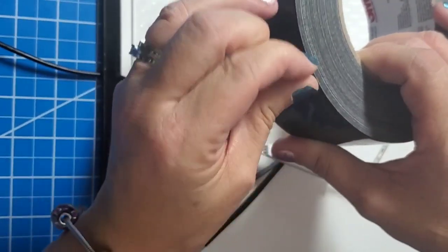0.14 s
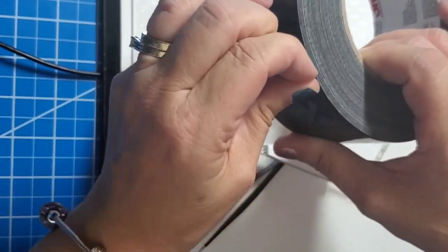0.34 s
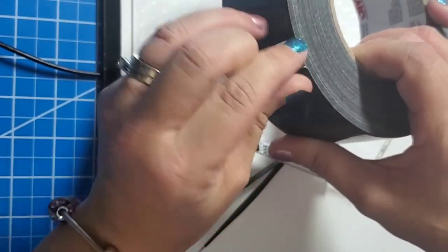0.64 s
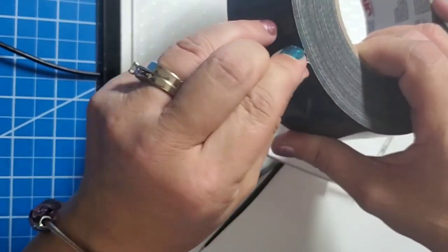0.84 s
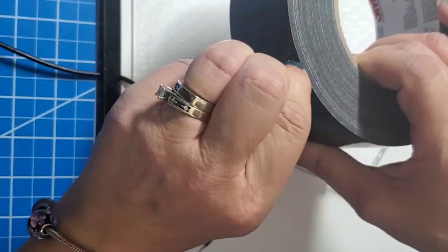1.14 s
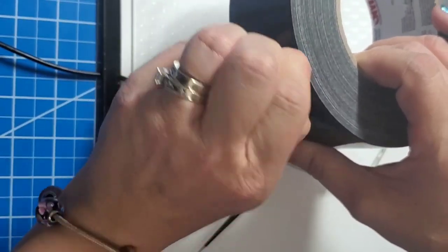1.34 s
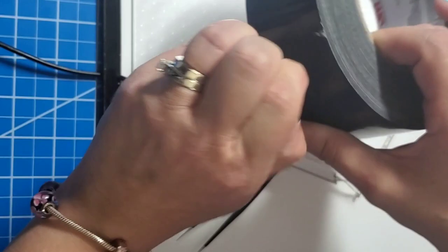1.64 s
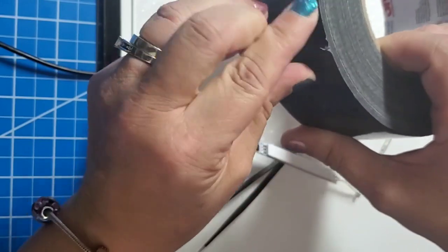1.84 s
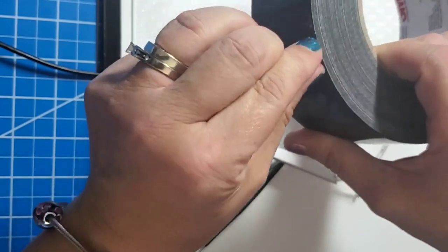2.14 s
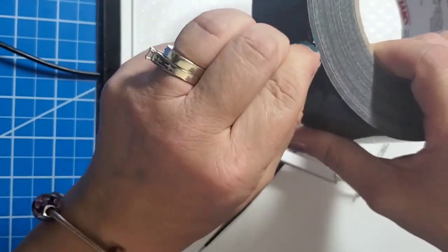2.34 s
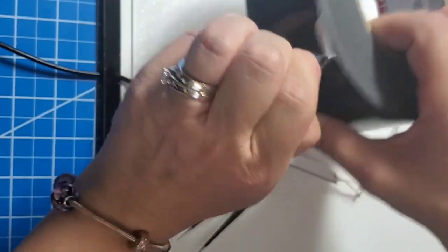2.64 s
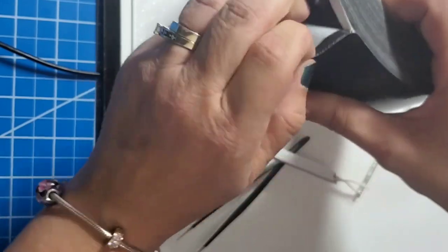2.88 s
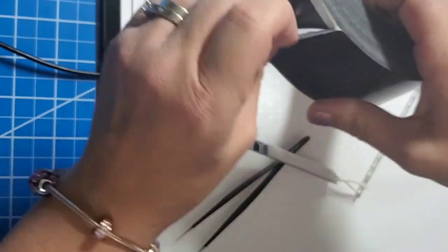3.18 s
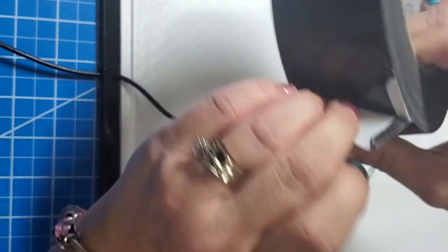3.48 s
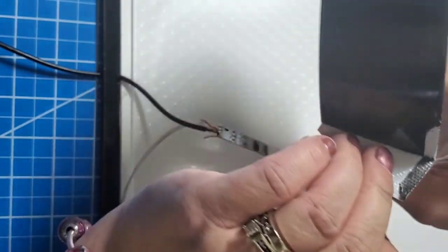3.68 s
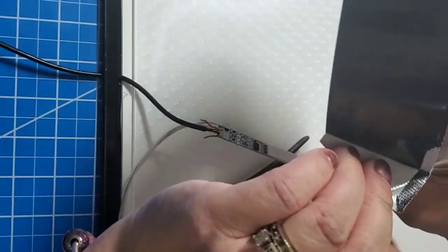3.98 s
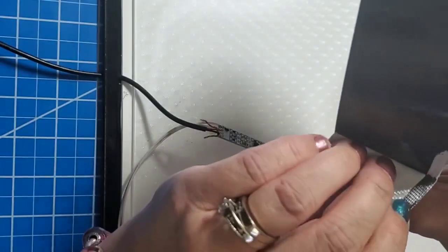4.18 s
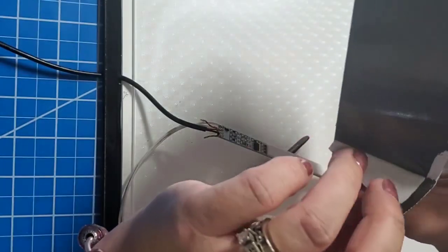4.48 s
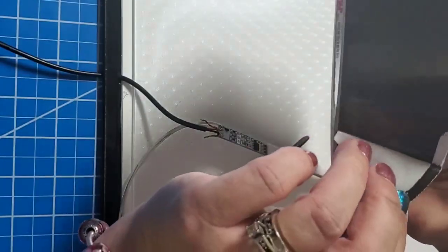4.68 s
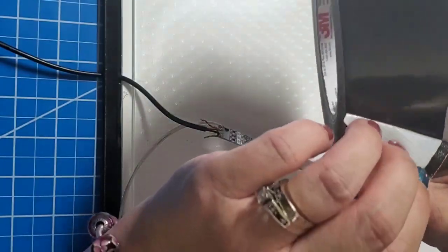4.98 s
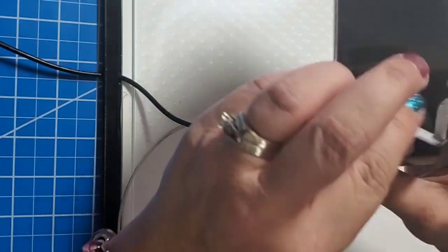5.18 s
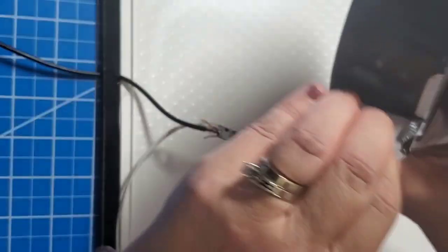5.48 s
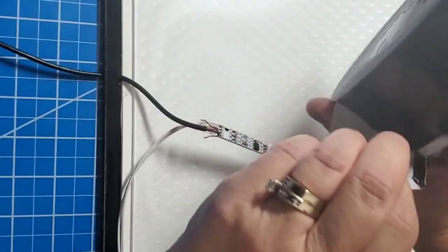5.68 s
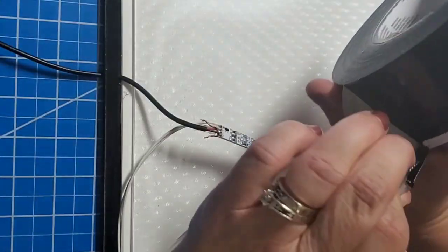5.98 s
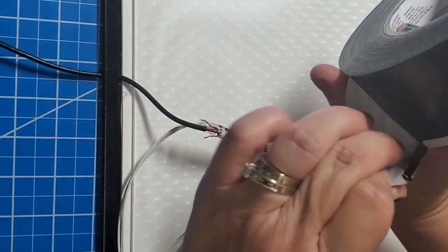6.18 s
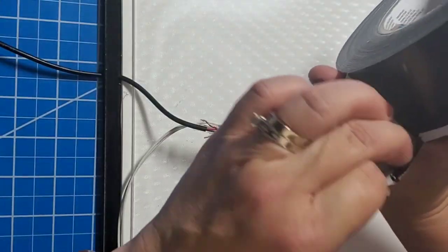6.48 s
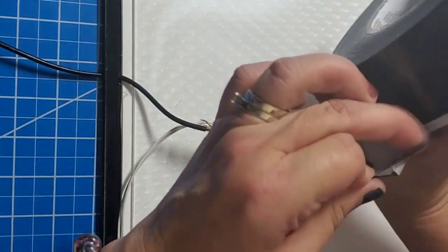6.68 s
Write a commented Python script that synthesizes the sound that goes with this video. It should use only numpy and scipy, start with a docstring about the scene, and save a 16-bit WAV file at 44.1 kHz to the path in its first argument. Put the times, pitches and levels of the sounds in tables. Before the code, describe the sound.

A quick peel of sticky tape, a pause, then a brief tear and stiff crackling close by.

```python
"""Duct tape peeled and torn

Tape is picked off its roll, peeled a little and torn across by hand over a desk in a quiet small room.
The glue lets go in a fizz of tiny strands, the cloth threads break in a short rip, and the stiff
strip snaps and crinkles as it buckles. A low hum runs underneath."""
import sys
import numpy as np
from scipy import signal
from scipy.fft import rfft, irfft
from scipy.io import wavfile

SR = 44100
rng = np.random.default_rng(int(sys.argv[2]) if len(sys.argv) > 2 else 0)


def persist_wave(psi):
    """Save psi, clipped to +-1, as 16-bit WAV."""
    counts = np.round(np.clip(psi, -1, 1) * 32767).astype(np.int16)
    wavfile.write(sys.argv[1], SR, np.atleast_2d(counts).T)


N = 300938


def from_db(db):
    """Decibels to gain."""
    return 10 ** (np.asarray(db) / 20)


def unit_rms(x):
    """Scale to rms 1."""
    return x / np.sqrt(np.mean(x ** 2) + 1e-20)


def drift(rate_hz):
    """Random wander of rms 1."""
    knots = rng.standard_normal(int(N / SR * rate_hz) + 2)
    return unit_rms(np.interp(np.arange(N) / SR * rate_hz, np.arange(len(knots)), knots))


def band(x, low_hz, high_hz=.45 * SR, order=2):
    """Causal band-pass."""
    return signal.sosfilt(signal.butter(order, [low_hz, high_hz], "band", fs=SR, output="sos"), x)


def coloured(x, colour, size=4096):
    """Minimum-phase filter that keeps white noise's power. Each colour row: Hz, relative density in dB."""
    hz, db = np.transpose(colour)
    bins_hz = np.fft.rfftfreq(size, 1 / SR)
    gain = unit_rms(from_db(np.interp(np.log(bins_hz + 1), np.log(hz), db)))
    cepstrum = irfft(np.log(gain))
    cepstrum[1:size // 2] *= 2
    cepstrum[size // 2 + 1:] = 0
    impulse = irfft(np.exp(rfft(cepstrum)))
    return signal.oaconvolve(x, impulse[None], axes=-1)[:, :x.shape[-1]]


def noise_pair(correlation, size):
    """Stereo white noise."""
    mid, side = rng.standard_normal((2, size))
    mid, side = np.sqrt(1 + correlation) * mid, np.sqrt(1 - correlation) * side
    return np.array([mid + side, mid - side]) / np.sqrt(2)


def panned(x, pan_db):
    """Equal-power pan; positive is left."""
    return x * unit_rms(from_db(np.array([[pan_db], [-pan_db]]) / 2))


def ping(t, hz, cycles):
    """Tone of rms 1 that swells and dies within a few cycles."""
    return unit_rms(np.sin(2 * np.pi * hz * t) * t * np.exp(-2 * t * hz / cycles))


def strokes(rows, fullness, peak_at):
    """Each pull swells and lets go in one arch; gain and break rate follow it."""
    t, gain, breaks_per_s = np.arange(N) / SR, np.zeros(N), np.zeros(N)
    for start_s, length_s, peak_db, peak_per_s in rows:
        phase = np.interp((t - start_s) / length_s, [0, peak_at, 1], [0, .5, 1])
        pull = (4 * phase * (1 - phase)) ** fullness
        gain = np.hypot(gain, from_db(peak_db) * pull)
        breaks_per_s = np.maximum(breaks_per_s, peak_per_s * pull ** .8)
    return gain, breaks_per_s


def crackle(pulls, colour, ring_s, correlation, pan_db, uneven_db=3, stick_slip_db=0):
    """Tiny breaks of uneven size come at random; each shakes the sheet briefly."""
    gain, breaks_per_s = pulls
    sizes = from_db(uneven_db * np.minimum(rng.exponential(1, N), 3)) ** 2
    # Tension builds and lets go: breaks come unevenly but never stall for long.
    thresholds = np.cumsum(rng.gamma(2, .5, N // 10))
    breaks = np.diff(np.searchsorted(thresholds, np.cumsum(breaks_per_s) / SR), prepend=0)
    rasp = unit_rms(from_db(stick_slip_db * drift(450)))
    energy = breaks * sizes / sizes.mean() * SR / np.maximum(breaks_per_s, 1) * (rasp * gain) ** 2
    pole = np.exp(-2 / (ring_s * SR))
    shake = np.sqrt(signal.lfilter([1 - pole], [1, -pole], energy + 1e-18))
    return panned(coloured(shake * noise_pair(correlation, N), colour), pan_db)


def desk_bumps(desk_hz=65, half_width_s=.028):
    """Hands bump the desk; its top sways briefly at its lowest pitch."""
    # Each row: centre in seconds, level in dB.
    bumps = [(0.169, -62), (1.252, -55.5), (1.72, -56), (2.291, -58.5), (2.37, -57), (3.139, -66),
             (5.169, -57.5)]
    t = np.arange(N) / SR
    return sum(from_db(db) * np.exp(-((t - s) / half_width_s) ** 2)
               * np.sin(2 * np.pi * desk_hz * (t - s)) for s, db in bumps)


def background(waver_db=4, rumble_db=-69.5, hiss_db=-84.5):
    """Wavering hum, room rumble and desk bumps, a little to the left; faint hiss in each channel."""
    # Each row: frequency in Hz, level in dB.
    hum_tones = [(75.4, -74), (123.8, -75.5), (150.7, -75)]
    # Each row: frequency in Hz, relative density in dB.
    rumble_colour = [(25, -16), (45, -12.5), (66, 0), (95, -8.5), (150, -7.5), (210, -14), (320, -22),
                     (600, -31), (1500, -43), (8000, -52.5)]
    hiss_colour = [(100, 3), (600, 2.5), (1500, 5.5), (5000, 2), (16000, -9)]
    t, hum = np.arange(N) / SR, np.zeros(N)
    for hz, db in hum_tones:
        amplitude = np.sqrt(2) * from_db(db + waver_db * drift(7.3))
        hum += amplitude * np.sin(2 * np.pi * hz * t + .5 * drift(1.1))
    rumble = from_db(rumble_db) * coloured(noise_pair(.96, N), rumble_colour)
    swell = band(rumble, 40, 90, order=1) * (from_db(-.5 * drift(11)) - 1)
    hiss = from_db(hiss_db) * coloured(rng.standard_normal((2, N)), hiss_colour)
    return panned(hum + rumble + swell + desk_bumps(), pan_db=3) + hiss


def room(x, t60_s=.18, build_s=.0028, level_db=-5, mono_below_hz=570, size=16384):
    """Dense reflections build fast and die evenly; only their bass is alike in both ears."""
    # Each row: frequency in Hz, relative density in dB.
    colour = [(200, -4.5), (400, -2.5), (620, 0), (1400, -1.5), (1950, -0.5), (2900, -2), (3800, 0.5),
              (7000, -2), (11000, 0.5), (16000, -3)]
    t = np.arange(size) / SR
    pair = noise_pair(.15, size)
    mid = pair.mean(axis=0)
    envelope = from_db(-60 * t / t60_s) * (1 - np.exp(-(t / build_s) ** 2))
    tail = (mid + band(pair - mid, mono_below_hz)) * envelope
    tail = coloured(unit_rms(tail), colour) / np.sqrt(size)
    return from_db(level_db) * signal.oaconvolve(x, tail, axes=-1)[:, :N]


def strip_resonance(x, q=12):
    """The stretched strip and the roll ring at a few pitches."""
    # Each row: frequency in Hz, boost in dB.
    modes = [(630, 4.5), (1930, 5.5), (2400, 2), (3800, 2.5), (4900, 2.5), (6150, 0)]
    return x + sum((from_db(db) - 1) * signal.lfilter(*signal.iirpeak(hz, q, fs=SR), x + 1e-18)
                   for hz, db in modes)


def finger_rub():
    """Fingertips slide and catch on the roll."""
    # Each row: start in seconds, length in seconds, peak in dB, peak catches per second.
    rubs = [(0.6, 1.1, -80.5, 3000)]
    # Each row: frequency in Hz, relative density in dB.
    colour = [(200, 9), (500, 11), (900, -0.5), (2500, -4.5), (4500, -2.5), (7500, -12), (11000, -3),
              (16000, -11.5)]
    pulls = strokes(rubs, fullness=1, peak_at=.61)
    return crackle(pulls, colour, ring_s=.002, correlation=.31, pan_db=-1.5)


def tack_lift():
    """The sticky face lifts slowly under the fingers."""
    # Each row: start in seconds, length in seconds, peak in dB, peak strands per second.
    lifts = [(0.125, 0.087, -72, 600), (1.614, .07, -63, 900), (1.55, .53, -77, 900),
             (3.58, 0.59, -72, 170)]
    # Each row: frequency in Hz, relative density in dB.
    colour = [(1500, -28), (2800, -11.5), (4300, -4.5), (6800, -6.5), (10500, 2), (16000, -8)]
    pulls = strokes(lifts, fullness=1.3, peak_at=.65)
    return crackle(pulls, colour, ring_s=.0013, correlation=.22, pan_db=-1.2)


def strip_creak():
    """The taut strip creaks in small slips."""
    # Each row: start in seconds, length in seconds, peak in dB, peak slips per second.
    creaks = [(6.215, 0.11, -53.5, 260), (6.46, .05, -64, 270), (6.58, 0.089, -75, 210)]
    # Each row: frequency in Hz, relative density in dB.
    colour = [(1500, -40), (2300, -30), (2800, -16.5), (3800, 1.5), (5200, -4.5), (7200, -19.5),
              (12000, -12), (16000, -17)]
    pulls = strokes(creaks, fullness=.45, peak_at=.39)
    return crackle(pulls, colour, ring_s=.00055, correlation=.51, pan_db=-2.8, uneven_db=2.5)


def glue_peel():
    """Glue strands let go in a slow lift, then a quick pull; the peel line sticks and jumps, rasping."""
    # Each row: start in seconds, length in seconds, peak in dB, peak strands per second.
    peels = [(2.56, .17, -68, 600), (2.688, .097, -26, 4200)]
    # Each row: frequency in Hz, relative density in dB.
    colour = [(300, -22), (700, -18.5), (1300, -12.5), (1900, -5), (2600, -3), (3000, -9.5), (3400, 0),
              (5500, 2), (7500, 1), (11000, 2), (16000, -4.5)]
    pulls = strokes(peels, fullness=1.4, peak_at=.58)
    return crackle(pulls, colour, ring_s=.00037, correlation=.32, pan_db=.8, stick_slip_db=2.5)


def thread_rip():
    """Cloth threads break and the sheet crumples."""
    # Each row: start in seconds, length in seconds, peak in dB, peak breaks per second.
    rips = [(2.722, .052, -33, 1450), (5.48, .062, -22, 1500), (5.735, 0.044, -49, 580),
            (5.87, 0.051, -37.5, 410), (5.98, 0.055, -51.5, 700), (6.725, 0.076, -42, 525)]
    # Each row: frequency in Hz, relative density in dB.
    colour = [(200, -23.5), (350, -19.5), (600, -5.5), (950, -3.5), (1400, -4), (2000, -2), (4000, -2.5),
              (8000, -4), (16000, -11)]
    pulls = strokes(rips, fullness=1.3, peak_at=.49)
    return crackle(pulls, colour, ring_s=.00079, correlation=.62, pan_db=-.7)


def snaps(rise_s=.00074, ring_s=.00068, desk_bounce_s=.0021, flap_cycles=1.3, correlation=.28, size=1024):
    """The strip buckles or a glue blob pops: the sheet cracks and flaps, a crease pings, the roll thuds."""
    # Each row: start in seconds, relative level in dB, crack centre in Hz, flap offset in dB.
    buckles = [(2.996, -65.5, 4410, -13), (3.191, -62.5, 2390, -9), (4.167, -49.5, 3980, -25),
               (4.5392, -49.5, 4100, -6), (5.1265, -57.5, 2915, -8.5), (5.1943, -53.5, 4000, -4),
               (5.2445, -57.5, 5180, -3), (5.4785, -17.5, 5996, -29), (5.48, -18.5, 5900, -21),
               (5.496, -24, 4830, -17), (5.5042, -17, 4440, -11), (5.5091, -20, 3680, -22),
               (5.525, -21.5, 4200, -2.5), (5.5385, -22.5, 5000, -21), (5.715, -36, 4620, -2.5),
               (5.8429, -45.5, 3670, -11.5), (5.8698, -16.5, 3670, -8), (5.9055, -33, 4520, -1.5),
               (5.9088, -21.5, 5800, -25.5), (6.0017, -42, 4335, -17), (6.0128, -37.5, 3350, -6.5),
               (6.0237, -46, 4060, -5.5), (6.222, -52, 4130, -38), (6.2618, -49, 4260, -34),
               (6.2937, -43.5, 4240, -31), (6.31, -16, 3260, -23.5), (6.3205, -33, 4020, -22),
               (6.333, -18, 2950, -20.5), (6.465, -46, 5140, -33), (6.5134, -34, 5520, -39),
               (6.542, -24.5, 4180, -13), (6.659, -42, 3960, -8.5), (6.7225, -36.5, 4797, -10),
               (6.7489, -22, 4720, -15.5)]
    # Each row: start in seconds, relative tick level in dB.
    glue_pops = [(1.6294, -50), (2.5653, -54.5), (2.602, -54), (2.641, -39), (2.6794, -39), (2.6909, -35.5),
                 (2.7305, -24), (3.1077, -61.5), (3.9563, -54.5), (4.2082, -55.5)]
    # Harder buckle, tauter sheet, higher flap. Each row: relative flap level in dB, pitch in Hz.
    flap_pitch = [(-65, 823), (-22, 1025)]
    events = [(s, hz, db, db + offset_db, db - 2) for s, db, hz, offset_db in buckles]
    events += [(s, 5500, db - 9, db - 30, db) for s, db in glue_pops]
    out, t = np.zeros((2, N + size)), np.arange(size) / SR
    shake = np.exp(-t / ring_s) * (1 - np.exp(-t / rise_s))
    shake += from_db(-10) * np.interp(t - desk_bounce_s, t, shake)
    thud = from_db(-35.5) * ping(t, hz=300, cycles=.92)
    scale = np.sqrt(.004 * SR / size)   # levels as rms over 4 ms
    for start_s, crack_hz, crack_db, flap_db, tick_db in events:
        burst = noise_pair(correlation, size) * shake
        crack = unit_rms(band(burst, crack_hz / 1.805, crack_hz * 1.805, order=5))
        crease = from_db(-7) * ping(t, crack_hz, cycles=4)
        tick = unit_rms(band(noise_pair(correlation, size) * shake, low_hz=7500))
        flap_hz = np.interp(flap_db, *np.transpose(flap_pitch))
        swing = np.sin(2 * np.pi * flap_hz * t) * np.exp(-t * flap_hz / flap_cycles)
        flap = unit_rms(band(swing, flap_hz / 1.8, flap_hz * 1.8))
        snap = from_db(crack_db - 2) * panned(crack + crease + thud, pan_db=-1.5)
        snap += from_db(tick_db - 1) * tick + from_db(flap_db - 1) * flap
        at = int(start_s * SR)
        out[:, at:at + size] += scale * snap
    return panned(out[:, :N], pan_db=-.67)


def scene(left_lag_s=.00015):
    """The tape is handled close by, a little to the right."""
    tearing = strip_resonance(glue_peel() + tack_lift() + thread_rip() + strip_creak() + finger_rub())
    snapping = strip_resonance(snaps())
    left, right = tearing + snapping
    n = np.arange(N)
    direct = np.array([np.interp(n - round(left_lag_s * SR), n, left), right])
    # Snaps face the listener and stir the room less.
    reflections = room(tearing + from_db(-1.5) * snapping)
    return direct + reflections + background()


def record(dry, ceiling=1.1, cutoff_hz=15900):
    """Soft clip, then a steep low-pass."""
    rounded = ceiling * np.tanh(dry / ceiling)
    return signal.sosfilt(signal.ellip(10, .2, 70, cutoff_hz, fs=SR, output="sos"), rounded)


dry = scene()
out = record(dry)
persist_wave(out)
```